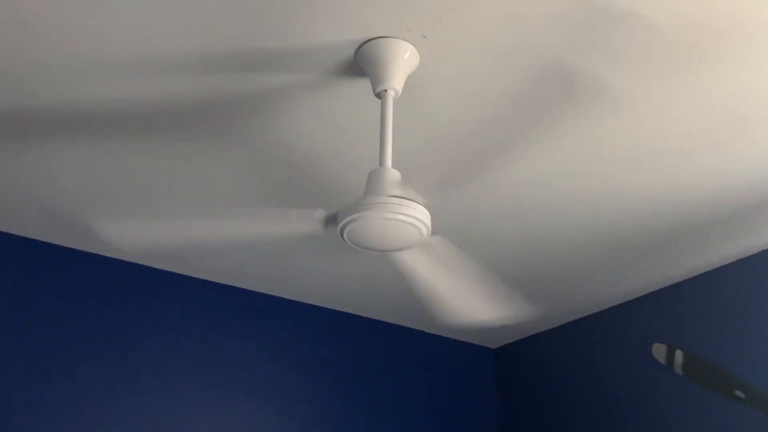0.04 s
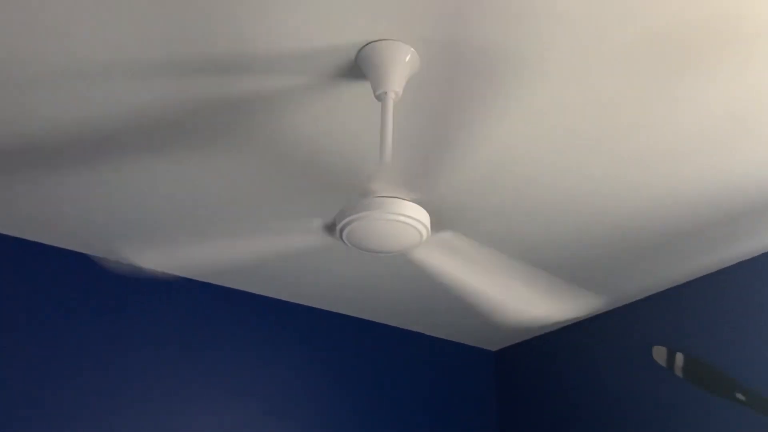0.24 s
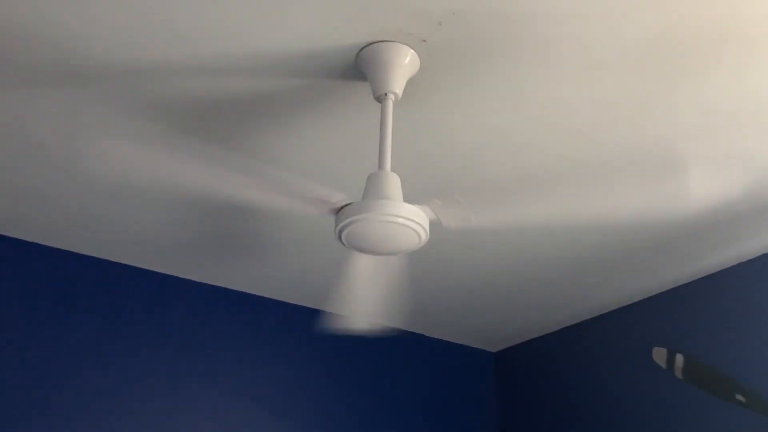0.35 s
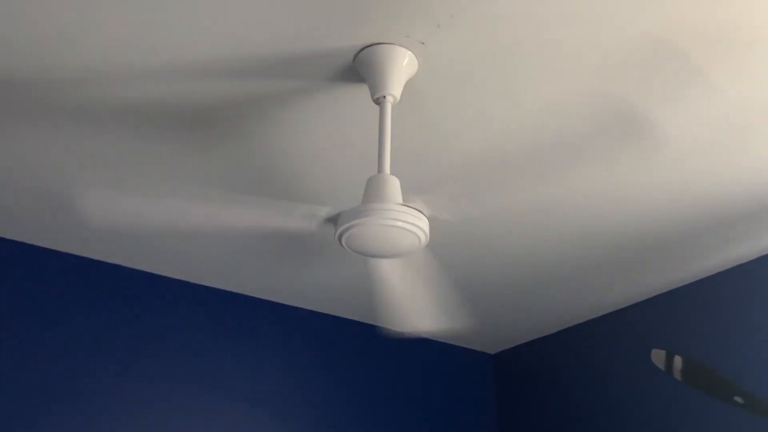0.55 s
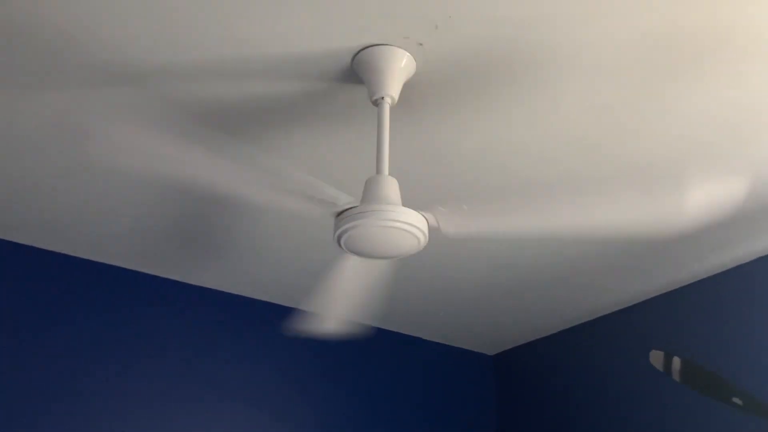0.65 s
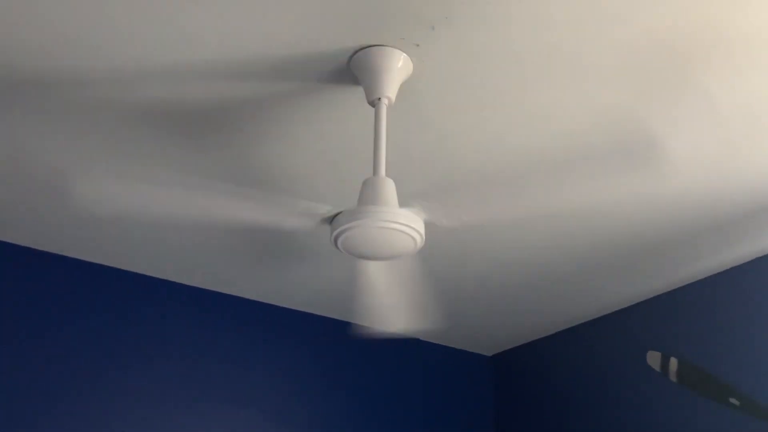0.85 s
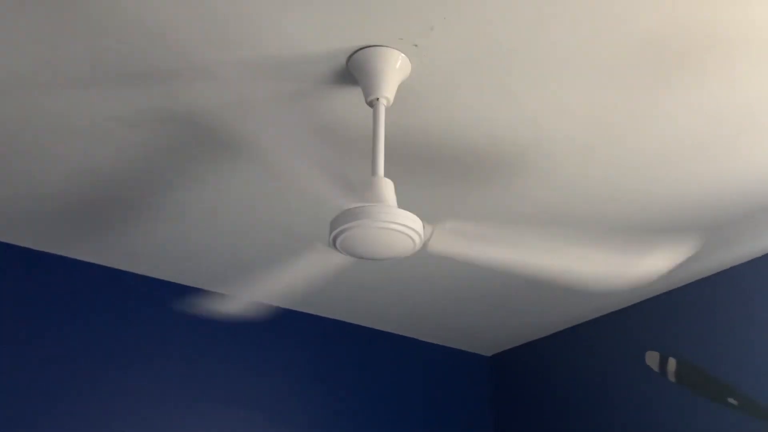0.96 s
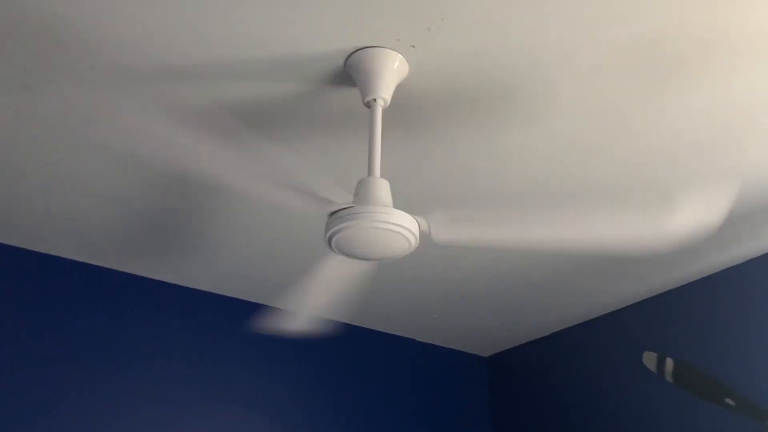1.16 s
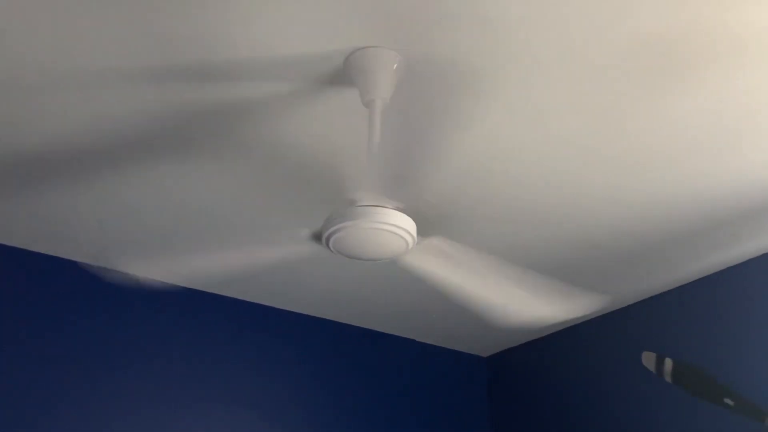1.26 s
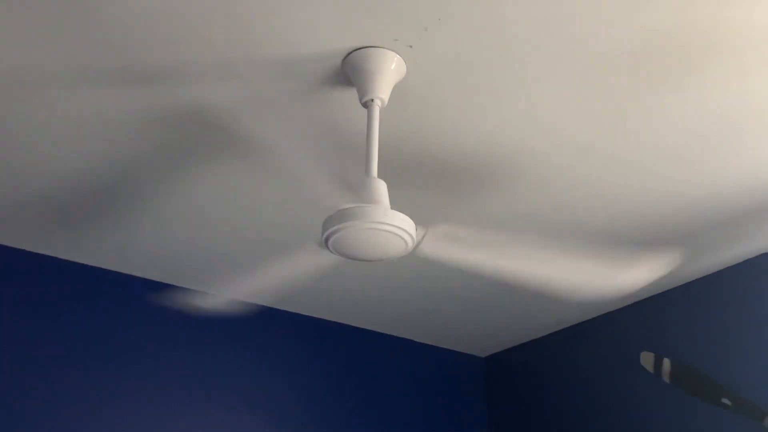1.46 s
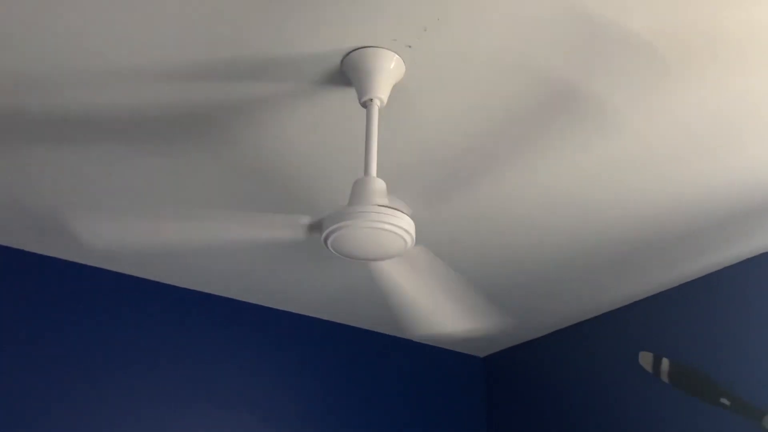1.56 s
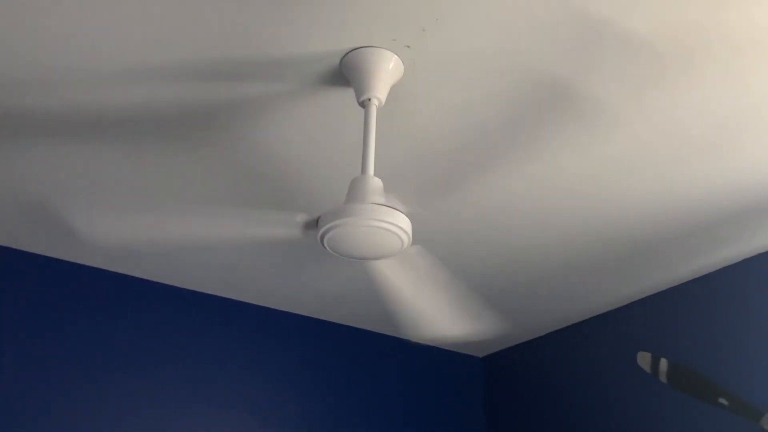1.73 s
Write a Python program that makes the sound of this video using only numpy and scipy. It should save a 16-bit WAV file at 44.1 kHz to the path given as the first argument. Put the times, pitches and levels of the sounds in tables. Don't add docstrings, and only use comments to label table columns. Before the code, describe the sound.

Quiet indoor ceiling fan: wavering deep motor hum over distant drones and muffled moving air, a bright tick then a duller one, two hum swells with faint housing resonance, light stereo microphone hiss throughout.

```python
import sys
import numpy as np
from scipy import signal
from scipy.fft import rfft, irfft, next_fast_len
from scipy.io import wavfile
from scipy.ndimage import uniform_filter1d, map_coordinates

SR = 44100
rng = np.random.default_rng(int(sys.argv[2]) if len(sys.argv) > 2 else 0)


def log_audio(samples):
    frames = np.atleast_2d(samples).T
    limited = np.clip(frames, -1, 1)
    pcm = np.round(limited * 32767).astype(np.int16)
    wavfile.write(sys.argv[1], SR, pcm)


def ratio(d):
    e = np.asarray(d, float) / 20
    return 10 ** e


N = 79380
T = np.arange(N) / SR


def unit(x):
    return x / np.sqrt(np.mean(x ** 2) + 1e-20)


def along(points, hz):
    f, v = np.transpose(points)
    return np.interp(np.log(hz + 1), np.log(f + 1), v)


def curve(rows):
    return uniform_filter1d(np.interp(T, *np.transpose(rows)), size=900)


def wobble(rate_hz):
    return map_coordinates(rng.standard_normal(200), [T * rate_hz])


def swell(t_s, length_s):
    return np.exp(-((T - t_s) / length_s) ** 2)


def window(start_s, attack_s, end_s, release_s):
    rise = 1 + np.exp(np.clip((start_s - T) * 4 / attack_s, -50, 50))
    fall = 1 + np.exp(np.clip((T - end_s) * 4 / release_s, -50, 50))
    return 1 / rise / fall


def filtered(x, response):
    m = next_fast_len(N + SR // 2)
    spectrum = rfft(x, m) * response(np.fft.rfftfreq(m, 1 / SR))
    return irfft(spectrum, m)[..., :N]


def bands(rows):
    return lambda f: sum(ratio(db) * 1j * f * w / (c * c - f * f + 1j * f * w) for c, w, db in rows)


def rush(colour, alike, lead=lambda hz: 0 * hz):
    common, apart = rng.standard_normal((2, N))
    side = np.array([[1], [-1]])

    def turn(hz):
        return np.arccos(np.clip(along(alike, hz), -1, 1)) / 2

    def shift(hz):
        return colour(hz) * np.exp(.5j * side * lead(hz))

    middle = filtered(common, lambda hz: shift(hz) * np.cos(turn(hz)))
    sides = filtered(apart, lambda hz: shift(hz) * side * np.sin(turn(hz)))
    return unit(middle + sides)


def tone(hz, pan_db, drift_rad, apart_rad):
    phase = 2 * np.pi * (hz * T + rng.random())
    phase += drift_rad * wobble(5) + 0.36 * drift_rad * wobble(40)
    pan = ratio([[pan_db / 2], [-pan_db / 2]])
    return np.sqrt(2) * pan * np.sin([phase + apart_rad, phase - apart_rad])


# t/s, level/dB
HUM_LEVEL = [(0.0, -61), (0.08, -52.5), (0.164, -57), (0.204, -50.5), (0.436, -59.5), (0.696, -49),
             (0.846, -61), (0.906, -39), (0.956, -34.5), (1.042, -35.5), (1.178, -70.5), (1.338, -48.5),
             (1.488, -40.5), (1.558, -60), (1.768, -52.5), (1.8, -59)]


def motor_hum():
    return ratio(curve(HUM_LEVEL)) * tone(120.45, -1.3, .25, .06)


# [(t/s, level/dB)]
DRONE_LEVELS = [
    (161.3, [(0, -65.5), (.25, -62.5), (.36, -53), (.47, -60), (.56, -54), (.75, -53), (1.28, -55), (1.36, -62), (1.8, -72)]),
    (73.4, [(0, -63.5), (.4, -57), (.55, -59), (.9, -55.5), (1.01, -50), (1.25, -52), (1.38, -56), (1.46, -68), (1.8, -60)]),
    (102.7, [(0, -72.5), (.5, -62), (.7, -53), (.85, -54), (1.15, -52.5), (1.3, -59), (1.4, -71.5)]),
]


def drones():
    shake_db = 1.2
    out = np.zeros((2, N))
    for hz, level in DRONE_LEVELS:
        out += ratio(curve(level) + shake_db * wobble(14)) * tone(hz, -.5, .25, .15)
    return out


def patches(pair):
    patchy_db = 2.0
    z = signal.stft(pair, nperseg=1024)[2]
    field = rng.standard_normal(z.shape[1:])
    field = uniform_filter1d(uniform_filter1d(field, size=4, axis=0), size=6, axis=1)
    return signal.istft(z * ratio(patchy_db * unit(field)), nperseg=1024)[1][:, :N]


# f/Hz, level/dB per Hz
AIR_COLOUR = [(20, -39), (45, -7), (75, -3), (130, -8.5), (200, -22), (450, -23), (700, -38.5),
              (3500, -63.5), (6000, -110)]
# f/Hz, likeness
AIR_ALIKE = [(40, 1), (130, 0.79), (290, 0.45), (630, 0.38), (1380, 0.17), (3000, 0.055)]
# t/s, level/dB
AIR_STIR = [(0, -70), (.05, -72.5), (.84, -70), (1.04, -65.5), (1.15, -71), (1.42, -65.5), (1.6, -70),
            (1.74, -67), (1.8, -68.5)]
# f/Hz, width/Hz, level/dB
ROOM_MODES = [
    (118.8, 48, -0.5),
    (160, 64, -9.5),
    (86.1, 9.5, -0.5),
]


def air():
    flow_db, boom_db = -56, -58.5
    stir_db = curve(AIR_STIR)
    flow = unit(patches(rush(lambda hz: ratio(along(AIR_COLOUR, hz)), AIR_ALIKE)))
    flow *= ratio(flow_db + 1.3 * (stir_db - stir_db.mean()))
    boom = ratio(boom_db) * rush(lambda hz: bands(ROOM_MODES)(hz) ** 2, [(100, 0.86)])
    return (flow + boom) * ratio([[-.7], [.7]])


# f/Hz, level/dB
HISS_COLOUR = [(300, -130), (900, 5), (2500, 1), (5000, -1), (7500, -1.5), (11500, -3), (14300, -6.5),
               (14800, -11.5), (15200, -16.5)]
# f/Hz, likeness
HISS_LIKENESS = [(4000, 0.046), (6500, .35), (7900, 0.85), (15000, 1)]


def microphone_hiss():
    level_db, in_step_hz, comb_hz = -83, 11380, 3310
    return ratio(level_db) * rush(lambda hz: ratio(along(HISS_COLOUR, hz)), HISS_LIKENESS,
                                lambda hz: 2 * np.pi * (hz - in_step_hz) / comb_hz)


# f/Hz, peak level/dB, first peak t/s, level between peaks/dB
WHINE_PEAKS = [
    (1315, -87.5, 0.263, -10),
    (1217, -93, .14, -16),
    (1200, -92.5, .47, -11.5),
    (1173, -88, .265, -29),
    (1072, -98, 0.098, -6),
]


def whines():
    turn_s, wink_s = 0.509, .04
    out = np.zeros((2, N))
    for hz, db, first_s, rest_db in WHINE_PEAKS:
        away_s = (T - first_s + turn_s / 2) % turn_s - turn_s / 2
        wink = ratio(rest_db) + np.exp(-(away_s / wink_s) ** 4)
        out += ratio(db + 3.2 * wobble(30)) * wink * tone(hz, -3, 1.3, 0.7)
    return out


# t/s, peak level/dB, pan/dB
TICK_EVENTS = [
    (0.522, -47.5, 10.5),
    (0.8663, -53.5, -2),
]
# right lag/s, attack/s, room level/dB
TICK_ONSETS = [
    (.00007, .00035, -12),
    (.00007, .0005, -12),
]
# f/Hz, level/dB, t60/s
TICK_RINGS = [
    [(6300, -3, .0035), (7270, 0, .004), (8300, -5, .003), (11000, -24, .002), (13500, -21, .003)],
    [(1450, -4, .009), (1950, -9, .007), (2480, 0, .013), (3950, -8, .008), (4700, -10, .005)],
]


def ticks():
    room_t60_s = .2
    out = np.zeros((2, N))
    for (start_s, db, pan_db), (lag_s, attack_s, room_db), modes in zip(TICK_EVENTS, TICK_ONSETS, TICK_RINGS):
        t = np.clip(T - start_s - lag_s * np.array([[0], [1]]), 0, None)
        ring = np.zeros((2, N))
        for k, (hz, mode_db, t60_s) in enumerate(modes):
            ring += (-1) ** k * ratio(mode_db - 60 * t / t60_s) * np.sin(2 * np.pi * hz * t)
        onset = 1 - np.exp(-(t / attack_s) ** 2)
        dry = ratio(db + pan_db * np.array([[.5], [-.5]])) * ring * onset
        tail = rng.standard_normal((2, SR // 4)) * ratio(-60 * T[:SR // 4] / room_t60_s)
        tail /= np.linalg.norm(tail[0])
        wet = signal.fftconvolve(np.pad(dry, ((0, 0), (200, 0))), tail, axes=1)[:, :N]
        out += dry + ratio(room_db) * wet
    return out


# t/s, f/Hz, width/Hz, level/dB
PUFFS = [(1.375, 920, 380, -73), (1.42, 740, 130, -71), (1.44, 500, 92, -85), (1.385, 1000, 300, -78),
         (1.025, 600, 62, -71), (2.1, 470, 570, -77), (0.63, 607, 190, -74.5), (1.22, 620, 250, -80.5),
         (1.48, 1200, 210, -81), (1.435, 4050, 220, -91), (1.5, 480, 260, -75.5)]


def puffs():
    length_s = .028
    out = np.zeros((2, N))
    for t_s, hz, width_hz, db in PUFFS:
        noise = rush(lambda f: bands([(hz, width_hz, 0)])(f) ** 2, [(800, 0.44)])
        out += ratio(db) * swell(t_s, length_s) * noise
    return out * ratio([[-1.5], [1.5]])


# t/s, length/s, f/Hz, level/dB
PANEL_RINGS = [
    (0.966, .035, 500.6, -64),
    (1.055, 0.026, 505.7, -62.5),
    (1.397, 0.071, 242.2, -62.5),
    (1.405, 0.032, 357.4, -67),
    (1.542, 0.043, 182.6, -56),
]


def panels():
    out = np.zeros((2, N))
    for t_s, length_s, hz, db in PANEL_RINGS:
        out += ratio(db + 0.69 * wobble(30)) * swell(t_s, length_s) * tone(hz, -2, 1.5, 0.39)
    return out


# f/Hz, width/Hz, level/dB
RUB_BANDS = [
    (2150, 70, -1),
    (2000, 250, -10),
    (2500, 300, 0),
    (3350, 250, -9),
    (4050, 180, -8),
]
# start/s, attack/s, end/s, release/s
RUB_SPAN = (1.338, .01, 1.455, .03)


def rustle():
    level_db, grain_db = -79, 1.2
    gain = ratio(level_db + grain_db * wobble(66)) * window(*RUB_SPAN)
    noise = rush(lambda hz: bands(RUB_BANDS)(hz) ** 2, [(2000, 0.11)])
    return gain * noise * ratio([[-1.5], [1.5]])


def scene():
    return motor_hum() + drones() + air() + whines() + ticks() + puffs() + panels() + rustle()


def low_pass(x):
    return signal.sosfilt(signal.butter(12, 15090, fs=SR, output="sos"), x)


def record(dry):
    fade_s = .012
    fade = np.sin(np.pi / 2 * np.clip((T[-1] - T) / fade_s, 0, 1))
    return low_pass(dry * fade + microphone_hiss())


dry = scene()
out = record(dry)
log_audio(out)
```